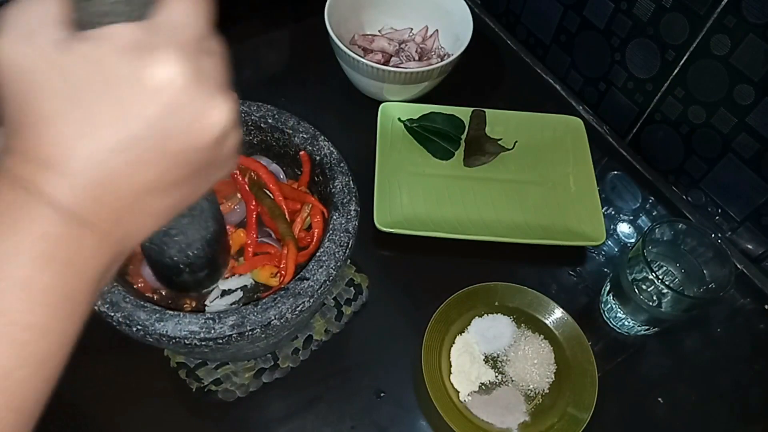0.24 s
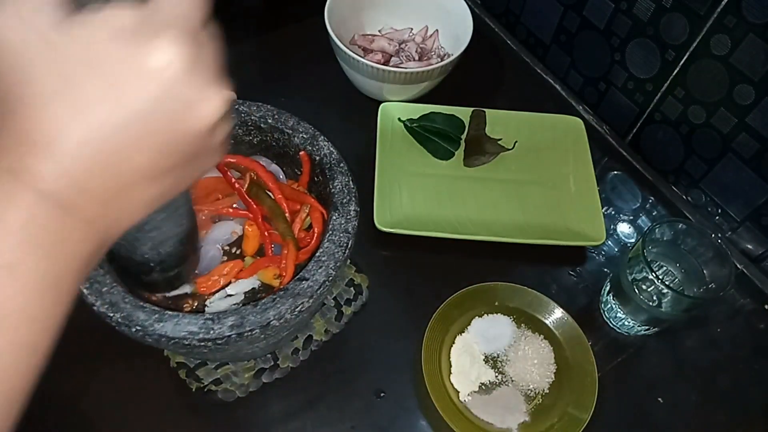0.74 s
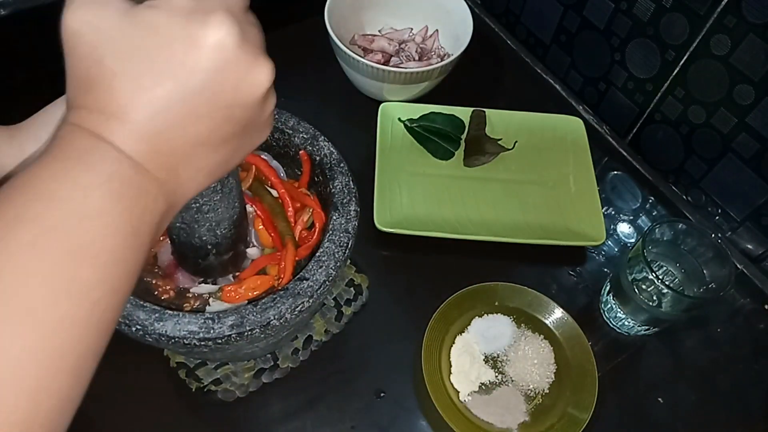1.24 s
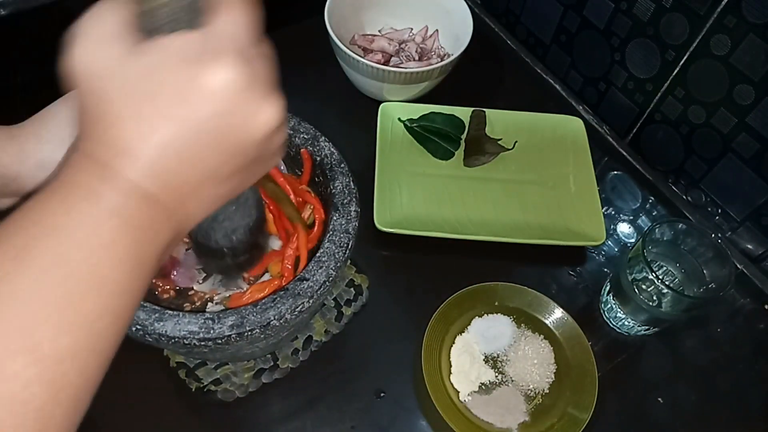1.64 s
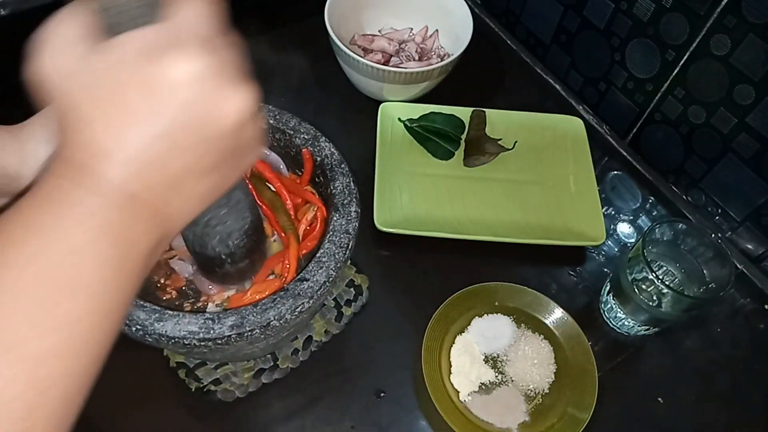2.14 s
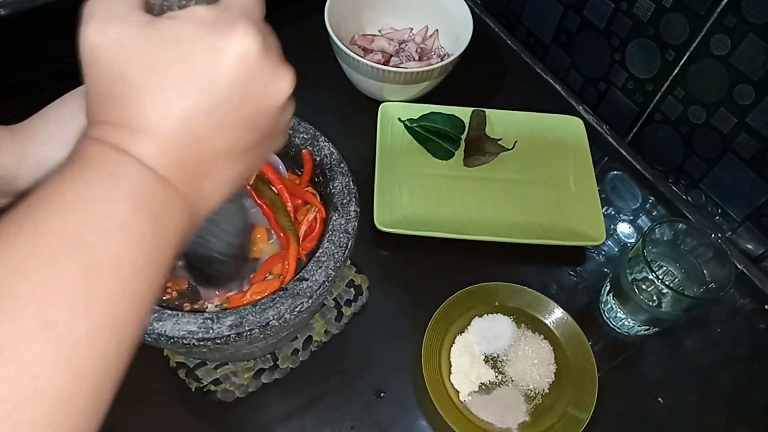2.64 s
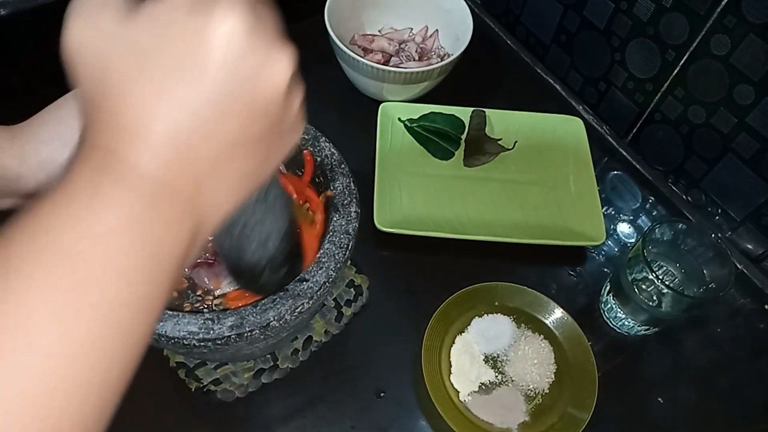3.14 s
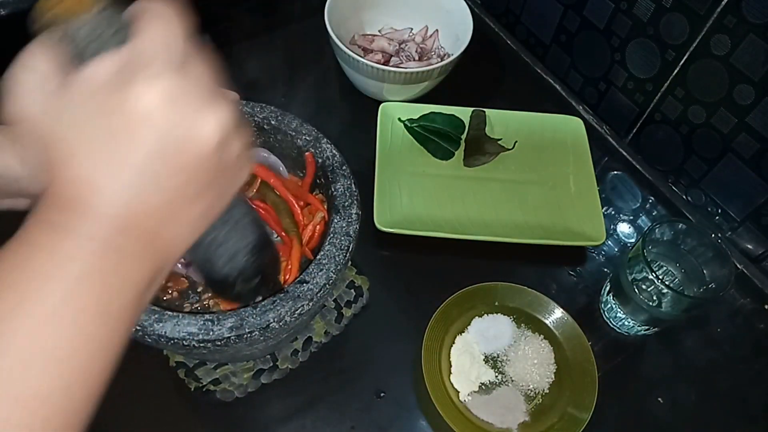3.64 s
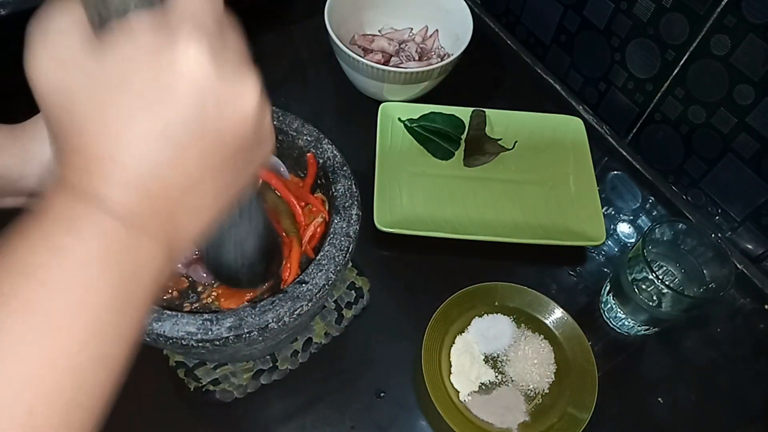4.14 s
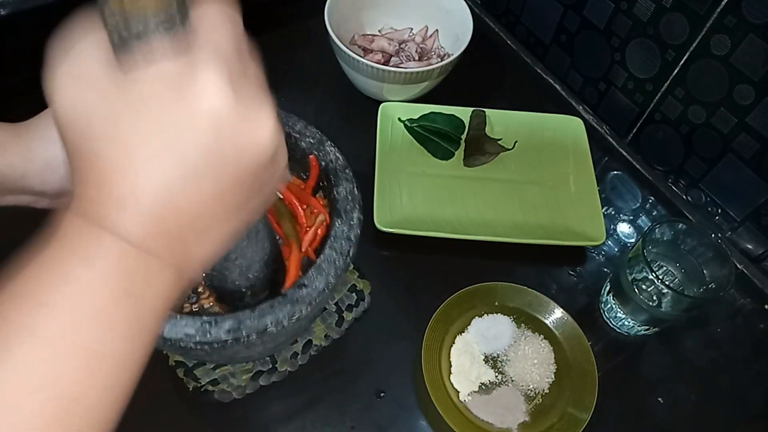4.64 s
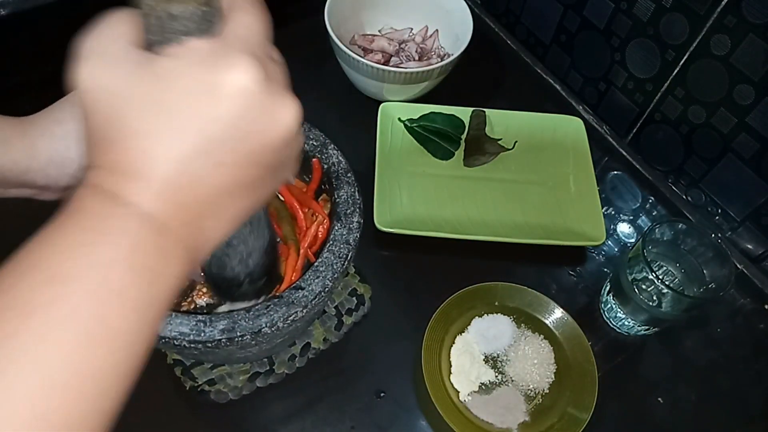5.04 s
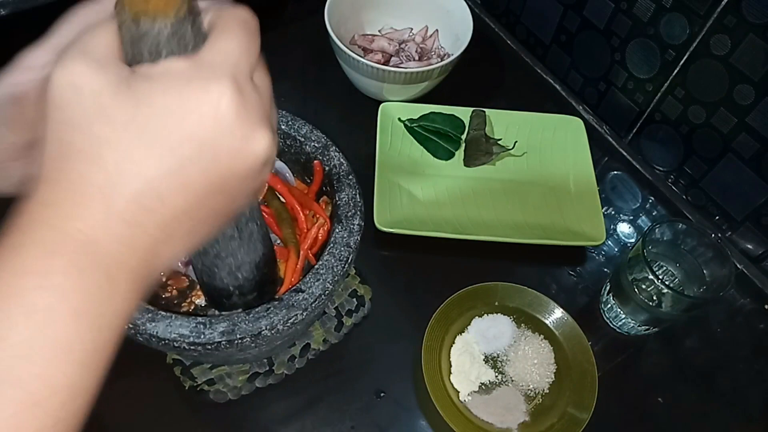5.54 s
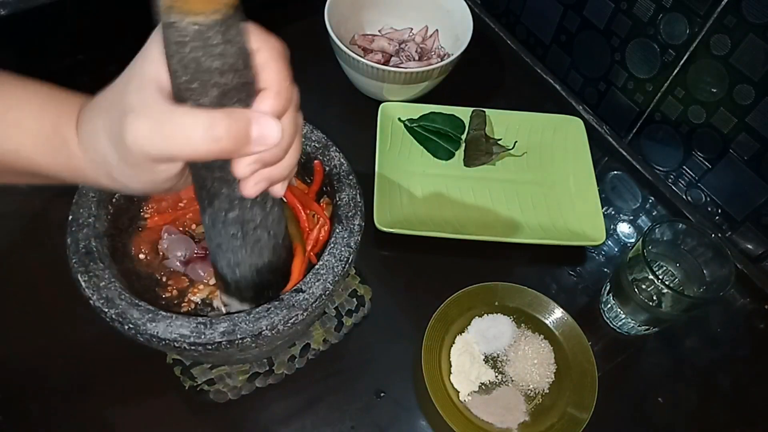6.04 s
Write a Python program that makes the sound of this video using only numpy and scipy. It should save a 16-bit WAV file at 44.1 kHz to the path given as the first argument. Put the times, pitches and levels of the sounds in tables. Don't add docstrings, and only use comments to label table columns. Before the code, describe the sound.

Close phone-microphone sound of a stone pestle crushing wet chillies and spices in a stone mortar, on a counter in a hard tiled kitchen. A faint stone ring and soft scrape open it; at 0.3 s a quick cluster of gritty cracks lands with a light thud. A clear stone clink sounds at 0.76 s, a damped touch and crunches around 0.9 to 1.0. From 1.3 to 3.0 the work is lighter and uneven: small snaps, squishy grinding, a dull hollow knock near 1.55, a tiny bright chink at 2.4. Firmer crunches come at 3.15 and 3.87, then heavy regular blows at about 4.14, 4.4 (the loudest), 4.64, 4.9 (softer), 5.14 and 5.39, each a dry crunch with a deep boom and rattle. After a short gap, two more fall at 5.9 and 6.2. Short room tails and faint hiss throughout.

```python
import sys
import numpy as np
from scipy import signal
from scipy.fft import rfft, irfft
from scipy.io import wavfile

SR = 44100
rng = np.random.default_rng(int(sys.argv[2]) if len(sys.argv) > 2 else 0)


def voltage_ratio(level):
    return 10 ** (np.asarray(level, float) / 20)


def wav_out(sig):
    wavfile.write(sys.argv[1], SR, np.round(np.clip(np.atleast_2d(sig).T, -1, 1) * 32767).astype(np.int16))


N = 277830

# (time [s], boom [dB], knock [dB])
COUNTER_HITS = [(0.318, -27, -46), (0.767, -31, -33.5), (0.905, -41, -46), (1.353, -33.5, -48),
                (1.546, -47, -28.5), (1.826, -30.5, -73), (1.948, -48, -41), (2.159, -38, -55),
                (2.76, -37.5, -49), (3.161, -22.5, -34), (3.873, -21, -59), (4.138, -13.5, -15.5),
                (4.395, -13, -11.5), (4.64, -16, -17), (4.901, -29.5, -35.5), (5.141, -15.5, -23),
                (5.393, -16, -15), (5.916, -14, -14), (6.207, -18.5, -29)]
# (frequency [Hz],
# level [dB per Hz])
GRIT_COLOUR = [(290, -12), (500, -23.5), (740, -21), (773, -7), (1210, -7), (1570, -3), (2190, -3),
               (2460, -3.5), (3200, -4.5), (3680, -2), (4400, -11.5), (5310, -25.5), (6600, -22.5),
               (10100, -38), (16000, -50)]


def rms_one(x):
    return x / np.sqrt(np.mean(x ** 2) + 1e-20)


def at_hz(points, hz):
    table_hz, values = np.transpose(points)
    return np.interp(np.log(hz), np.log(table_hz), values)


def low_pass(x, order, hz):
    return signal.sosfilt(signal.butter(order, hz, fs=SR, output="sos"), x)


def band(x, low_hz, high_hz):
    return rms_one(signal.sosfilt(signal.butter(3, [low_hz, high_hz], "band", fs=SR, output="sos"), x))


def colour(x, spectrum):
    hz = np.maximum(np.fft.rfftfreq(len(x), 1 / SR), 1)
    return irfft(rfft(x) * voltage_ratio(at_hz(spectrum, hz)), len(x))


def drift(rate_hz):
    r = np.exp(-2 * np.pi * rate_hz / SR)
    wander = signal.lfilter([1], [1, -2 * r, r * r], rng.standard_normal(N + SR))
    return rms_one(wander[SR:])


def strike(times, levels_db, hz, t60):
    clicks = np.full(N + SR, 1e-18)
    at = np.round((np.asarray(times) + 0.5) * SR).astype(int)
    np.add.at(clicks, at, voltage_ratio(levels_db))
    r = voltage_ratio(-60 / (t60 * SR))
    w = 2 * np.pi * hz / SR
    ringing = signal.lfilter([0, np.sin(w)], [1, -2 * r * np.cos(w), r * r], clicks)
    return ringing[SR // 2:][:N]


def grains(per_s, spread_db):
    sizes = voltage_ratio(spread_db * np.minimum(rng.exponential(1, N), 5))
    signs = rng.choice([-1, 1], N)
    return sizes * signs * (rng.random(N) < per_s / SR)


def crunch():
    # (time [s], crunch peak [dB], dull part [dB], bright part [dB], length [ms])
    blows = [(0.293, -15, -0.5, -14, 6.6), (0.301, -16, -4.5, -12, 8.2), (0.3114, -5, -10.5, -10.5, 8.7),
             (0.3183, -7, -9.5, -30, 5.7), (0.8667, -13.5, -21, -15, 4.1), (0.8998, -22.5, 3, -2.5, 2.3),
             (1.0255, -18.5, -11, -36, 6.9), (1.3394, -31.5, 0, -13.5, 10.3),
             (1.938, -21.5, -4.5, -23, 6.6), (2.073, -31.5, -29, -18, 36), (2.4033, -19.5, -2.5, -10, 1.13),
             (2.7562, -22, -10, -6, 11.6), (3.1543, -12, -8, -16.5, 12.7), (3.4926, -27, -12.5, -15, 18),
             (3.8696, -4.5, -4, -15, 6.6), (4.1379, -6.5, -7.5, -13.5, 3.6), (4.396, 3.5, -3.5, -13, 3.12),
             (4.6405, -5.5, -3.5, -10.5, 4), (4.901, -14, -9, -15, 6.4), (5.1402, -6.5, -8, -7.5, 3.5),
             (5.3942, -4.5, -2.5, -12, 3.6), (5.9143, -8, -6, -13, 5.1), (6.2063, -10.5, -5, -16, 6.9)]
    # (time [s], peak [dB], dull part [dB], bright part [dB])
    snaps = [(0.0438, -27.5, -3.5, -31), (0.2035, -42.5, -11, -13), (0.5286, -27.5, -23, -19),
             (0.855, -26, -16, -6), (0.883, -21, -17, -15), (1.0624, -23, -1, -14), (1.4697, -36, -15, -16),
             (1.5227, -24, -18, -34), (1.555, -28.5, 4.5, -28), (1.6765, -46, -9, -8.5),
             (1.807, -29.5, -10, -21), (1.82, -27, -33, -9.5), (1.912, -36, -10, -41), (1.968, -32, 6, -19),
             (1.982, -23, -2, -16), (2.1562, -23, -23, -49), (2.3117, -25.5, 3.5, -21),
             (2.4236, -33, 3.5, -29), (2.6814, -49, -2, -35), (2.812, -32, 6.5, -32),
             (2.9467, -31, -1, -14), (2.9734, -19.5, -3.5, -24), (3.507, -27, -14, -7),
             (3.5433, -39, -7, -5), (3.621, -35.5, -24, -12), (4.389, -38, -18, -36),
             (5.9057, -34, -25, -44)]
    # (level [dB], t60 [s])
    afterglow = [
        (-16.5, 0.14),
        (-23.5, 0.5),
        (-21, 0.51),
    ]
    snap_ms = 3.7
    edges_hz = [(500, 1908), (1500, 5330), (5200, 15100)]
    near = colour(grains(9000, spread_db=3.5), GRIT_COLOUR)
    far = colour(grains(20000, spread_db=-0.5), GRIT_COLOUR)

    t = np.arange(-SR // 20, SR // 10) / SR
    shapes = np.zeros((3, N + SR))
    for s, peak_db, dull_db, bright_db, ms in blows + [(*snap, snap_ms) for snap in snaps]:
        squeeze_db = -25 - 0.6 * peak_db
        u = np.maximum(t, 0) / (ms / 1000)
        crack = (u * 2.14) ** 1.61 * np.exp(1 - u * 2.648)
        swell = crack + voltage_ratio(squeeze_db) * np.exp(-np.abs(t) / 0.0039)
        i = round((s - 0.0006) * SR)
        strengths = voltage_ratio([dull_db, 0, bright_db]) * voltage_ratio(peak_db - 4)
        shapes[:, i:i + len(t)] += np.outer(strengths, swell)
    shapes = shapes[:, SR // 20:][:, :N]

    grit, glow = 0, 0
    t = np.arange(SR) / SR
    for shape, edge, (db, t60) in zip(shapes, edges_hz, afterglow):
        fading = reflections(t) ** 2 * voltage_ratio(-120 * t / t60)
        energy = signal.fftconvolve(shape ** 2, fading)[:N] / (SR / 250)
        grit = grit + shape * band(near, *edge)
        glow = glow + voltage_ratio(db) * np.sqrt(np.abs(energy)) * band(far, *edge)
    return grit, glow


def counter():
    # (frequency [Hz], level [dB], t60 [s], arrival [ms])
    boom = [(63, -17, .9, 5.5), (73, 5, .2, 17.5), (86, -6, 1.0, 13.5), (90, 3, .035, 8.1),
            (90, 2, .035, 19.2), (104, -6, 1.1, 12.9), (129, -4, .12, 12.2)]
    # (frequency [Hz], level [dB], t60 [s], arrival [ms])
    knock = [(148.9, 4.5, 0.35, 5.93), (181.2, -14.5, 0.9, 9.7), (219.4, -0.5, 0.3, 5.83),
             (238.3, -4.5, 0.14, 5.48), (265, -7, 0.028, 3.18), (310, -17, 0.56, 5.92),
             (354.3, -20.5, 0.75, 4.72), (409, -19.5, 0.52, 2.56), (532, -5.5, 0.017, 1.86),
             (650, -11, 0.034, 0.82)]
    # (time after the blow [ms], level [dB])
    rocking = [
        (72.5, -1),
        (117.5, 5.5),
    ]
    s, boom_db, knock_db = np.transpose(COUNTER_HITS)
    out = -sum(strike(s + ms / 1000, boom_db + db, hz, t60) for hz, db, t60, ms in boom)
    out = out - sum(strike(s + ms / 1000, knock_db + db, hz, t60) for hz, db, t60, ms in knock)
    out = out - sum(strike(s + ms / 1000, knock_db + db, hz=138, t60=0.029) for ms, db in rocking)
    out = out + strike(s + 3.84 / 1000, knock_db - 7.5, hz=145, t60=0.042)
    pitches_hz = rng.uniform(259, 868, 40)
    lags_s = rng.uniform(0.0033, 0.01204, 40)
    lucks_db = rng.normal(0, 1.46, (40, len(s)))
    for hz, lag, luck in zip(pitches_hz, lags_s, lucks_db):
        out = out + strike(s + lag, knock_db - 31 + luck, hz, t60=203 / hz)
    return low_pass(out, 2, 900)


def stone():
    # (time [s], level [dB], share of free ring time, gain of the bowl modes [dB])
    clinks = [
        (-.03, -24, 2.1, -6),
        (0.76, -9.5, 0.92, 3.5),
        (.9018, -15, 0.27, -5),
        (1.555, -31, 0.39, -2),
    ]
    # (frequency [Hz], level [dB], t60 [s])
    modes = [(684, -4.5, 0.019), (895, 1, 0.026), (1015, 4.5, 0.016), (1313, 3.5, 0.019),
             (1603, -3.5, 0.041), (1853, 4.5, 0.022), (2130, -6, 0.052), (2557, -3, 0.16), (2592, 4, 0.045),
             (2650, -3, 0.099), (2770, -8, 0.066), (4850, -6.5, 0.018), (5600, -1, 0.0094),
             (8000, -16, 0.034)]
    pestle_from_hz, touch_s = 2300, 0.0004
    luck = rng.normal(0, 1.2, (len(clinks), len(modes)))
    t = np.arange(2 * SR) / SR
    out = np.zeros(N)
    for (s, level_db, free, bowl_db), strengths_db in zip(clinks, luck):
        age = np.maximum(t - s, 0)
        rise = 1 - np.exp(-age / touch_s)
        for (hz, db, t60), own_db in zip(modes, strengths_db):
            start_db = level_db + db + own_db + bowl_db * (hz < pestle_from_hz)
            fade = voltage_ratio(start_db - 60 * age / (t60 * free))
            out[:2 * SR] += fade * np.sin(2 * np.pi * hz * age) * rise
    return out


def tock():
    # (frequency [Hz], level [dB], t60 [s])
    modes = [(153, -23, .15), (236, -3, 0.13), (365, -2, 0.11), (443, -6, 0.15), (614, 2.5, 0.019),
             (716, -4, 0.022), (877, 0.5, 0.048), (940, -14, 0.07)]
    start_s, level_db, lag_cycles = 1.5525, -20, 1.61
    return -sum(strike([start_s + lag_cycles / hz], level_db + db, hz, t60) for hz, db, t60 in modes)


def shard():
    # (frequency [Hz], level [dB], t60 [s])
    modes = [(3645, 2, .04), (3730, 0, 0.047), (4080, 5, 0.022), (6530, 2.5, 0.022), (6680, -2, 0.028),
             (6770, -6, 0.025), (7300, -11, .03)]
    start_s, level_db = 2.4035, -27.5
    return sum(strike([start_s], level_db + db, hz, t60) for hz, db, t60 in modes)


def grinding():
    # (middle [s], scrape [dB], half length [s], fine grit from scrape [dB], dull hum from scrape [dB])
    drag_table = [(0.0, -38, 0.098, -10, -14), (0.406, -51.5, 0.28, -15, -2.5),
                  (1.085, -41, 0.1, -11.5, -11.5), (1.296, -58, 0.084, -5, 5.5),
                  (1.539, -40.5, 0.065, -9, -7), (2.001, -39.5, 0.054, -13, -23),
                  (2.318, -55.5, 0.18, -12, -14), (2.76, -42.5, 0.11, -12, -15.5),
                  (2.518, -59.5, 0.09, -1, 9), (2.985, -50.5, 0.11, -8, 1), (3.216, -41.5, 0.12, -11, -35),
                  (3.644, -45, 0.1, -11, -22), (3.912, -60.5, 0.18, -18, 17), (4.08, -64, 0.11, -19, -5),
                  (4.72, -41, 0.098, -30, -6.5), (5.217, -44, 0.087, -20, 1.5),
                  (5.726, -53.5, 0.23, -5, -10), (6.196, -42, 0.094, -14, -17)]
    # (time [s], level [dB])
    lean = [(0, -44), (.4, -42.5), (.6, -49), (.9, -35), (1.2, -45), (1.4, -41.5), (1.7, -37.5),
            (1.88, -43.5), (2.0, -34), (2.12, -43.5), (2.45, -38.5), (2.74, -49), (3.2, -35), (3.65, -42),
            (3.85, -38.5), (4.2, -33.5), (5.6, -39.5), (6.3, -41.5)]
    # (frequency [Hz], level [dB per Hz])
    rumble = [(15, -63), (25, -8), (94, 5), (202, -7), (249, -10), (426, -20), (492, -15), (659, -22.5),
              (897, -30.5), (1200, -24), (1560, -19), (2640, -120)]
    t = np.arange(N) / SR

    scrape, fine, drag_hum = voltage_ratio(-53.5), voltage_ratio(-64), 0
    for s, db, half, fine_db, hum_db in drag_table:
        drag = voltage_ratio(db) * np.exp(-((t - s) / half) ** 2)
        scrape = scrape + drag
        fine = fine + drag * voltage_ratio(fine_db)
        drag_hum = drag_hum + drag * voltage_ratio(hum_db)

    lean_db = np.interp(t, *np.transpose(lean))
    rest_hum = voltage_ratio(-61.5 + 0.6 * (lean_db - lean_db.mean()))
    rattle_db, rattle_peak_s = -29.5, 0.078
    rattle_power = 0
    for s, _, knock_db in COUNTER_HITS:
        u = np.maximum(t - s, 0) / rattle_peak_s
        rattle_power = rattle_power + (voltage_ratio(knock_db + rattle_db) * u * np.exp(1 - u)) ** 2
    hum = rest_hum + np.sqrt(rattle_power) + drag_hum

    grit = colour(grains(5000, spread_db=0), GRIT_COLOUR) * voltage_ratio(1.7 * drift(8.6))
    edges_hz = np.geomspace(1000, 4500, 7)
    squish = 0
    for pair in zip(edges_hz, edges_hz[1:]):
        cut = signal.butter(2, pair, "band", fs=SR, output="sos")
        squish = squish + signal.sosfilt(cut, grit) * voltage_ratio(2.1 * drift(6))
    squish = rms_one(squish)

    low = colour(rng.standard_normal(N), rumble)
    shudder = voltage_ratio(lean_db) * band(low, 34, 316) * voltage_ratio(2 * drift(2.3))
    shudder = shudder + hum * band(low, 273, 1170) * voltage_ratio(1.8 * drift(30))
    return scrape * squish + fine * band(grit, 3940, 11600) + shudder


def reflections(t):
    # (delay [ms], level over the tail [dB])
    echoes = [
        (9.0, 4.5),
        (21.0, 1),
        (38.0, 0.5),
        (58.0, -3.5),
        (77.0, -1),
    ]
    lumps_db = sum(db * np.exp(-((t - ms / 1000) / 0.0043) ** 2) for ms, db in echoes)
    return voltage_ratio(lumps_db) * (1 - np.exp(-(t / 0.00063) ** 2))


def kitchen(x, gap_s):
    # (frequency [Hz], t60 [s])
    room_t60 = [(300, 0.39), (1000, 0.71), (2500, 0.55), (6400, 0.38), (14000, 0.19)]
    t = np.arange(SR) / SR
    tail = 0
    for hz in 250 * 2 ** np.arange(0, 6, 0.5):
        noise = band(rng.standard_normal(SR), hz, hz * np.sqrt(2)) * np.sqrt(hz)
        tail = tail + noise * voltage_ratio(-60 * t / at_hz(room_t60, hz))
    tail = tail * reflections(t) * (1 - np.exp(-(t / gap_s) ** 4.8))
    return signal.fftconvolve(x, tail / np.sqrt(np.sum(tail ** 2)))[:N]


def hiss():
    return voltage_ratio(-80) * band(rng.standard_normal(N), 8200, 15600)


def scene():
    grit, glow = crunch()
    slab, foot = counter(), tock()
    ring, chink = low_pass(stone(), 2, 8000), low_pass(shard(), 2, 8000)
    dull_ring = low_pass(ring, 6, 3100)
    to_room = voltage_ratio(-8) * grit + voltage_ratio(-2.5) * slab + voltage_ratio(-7.5) * foot + voltage_ratio(-10.5) * chink
    room = kitchen(to_room, gap_s=0.00033)
    room = room + kitchen(voltage_ratio(-7.5) * dull_ring, gap_s=0.013)
    mix = grit + glow + ring + slab + foot + chink + room + grinding() + hiss()
    return mix[None]


def roll_off(x):
    return signal.sosfilt(signal.butter(12, 16400, fs=SR, output="sos"), x)


def record(dry):
    heard = signal.sosfilt(signal.butter(2, 48, "high", fs=SR, output="sos"), dry)
    heard = heard + voltage_ratio(8) * signal.lfilter(*signal.iirpeak(15400, 14, fs=SR), heard)
    heard = signal.sosfilt(signal.cheby2(14, 60, 16150, fs=SR, output="sos"), heard)
    return roll_off(0.71 * np.tanh(heard / 0.85))


dry = scene()
out = record(dry)
wav_out(out)
```